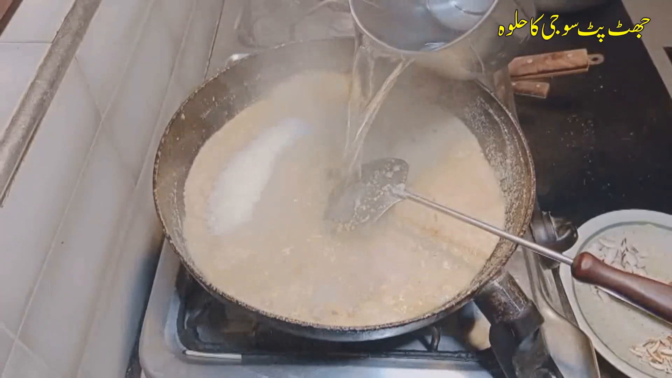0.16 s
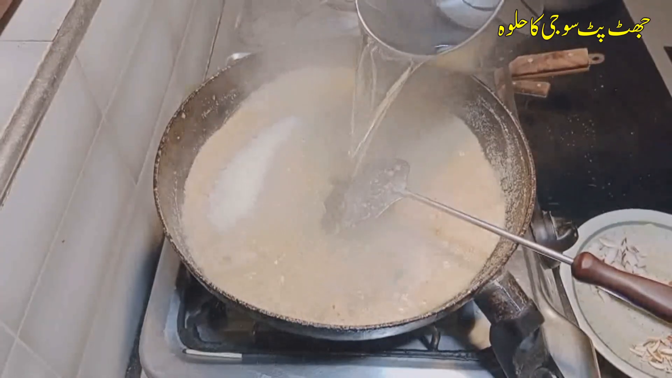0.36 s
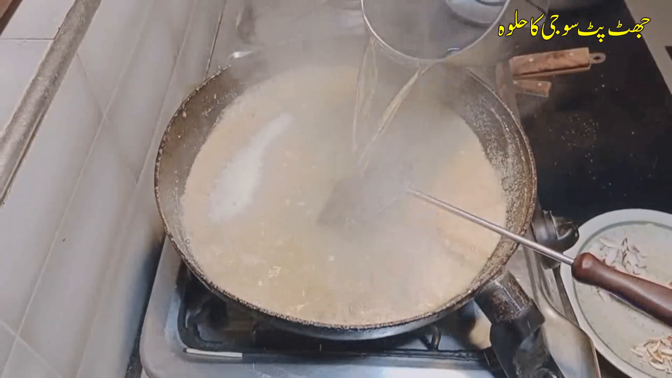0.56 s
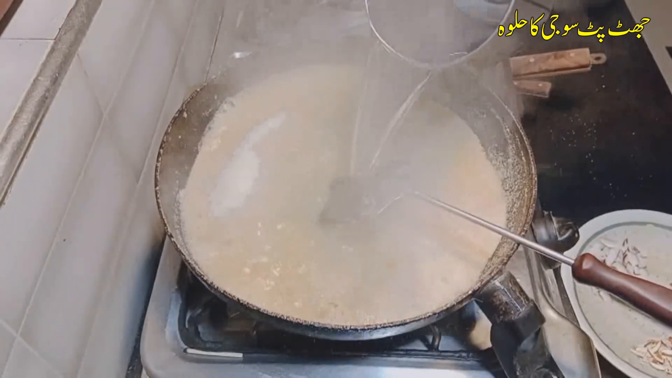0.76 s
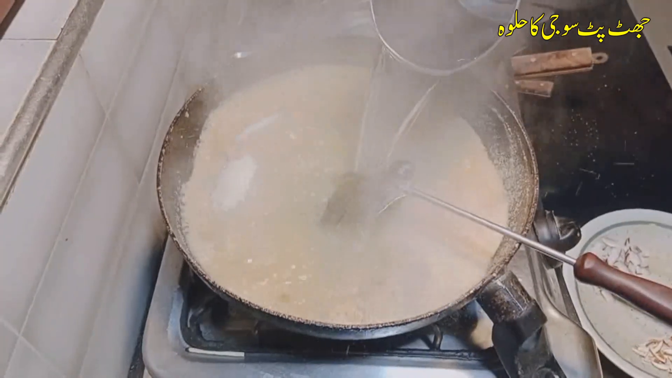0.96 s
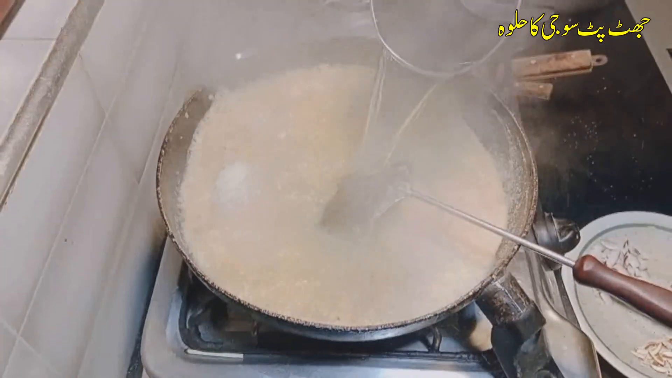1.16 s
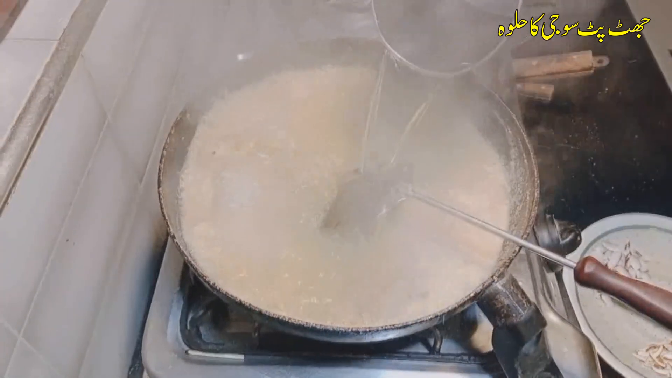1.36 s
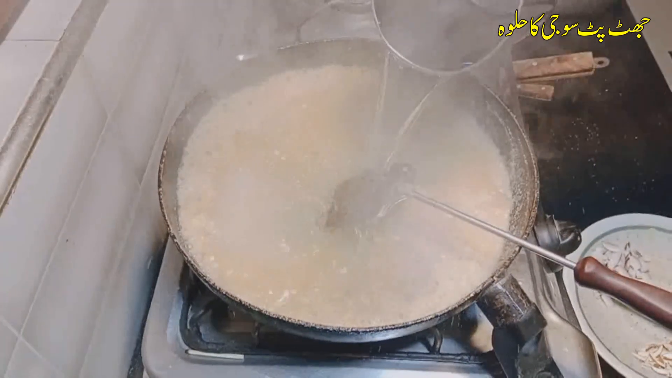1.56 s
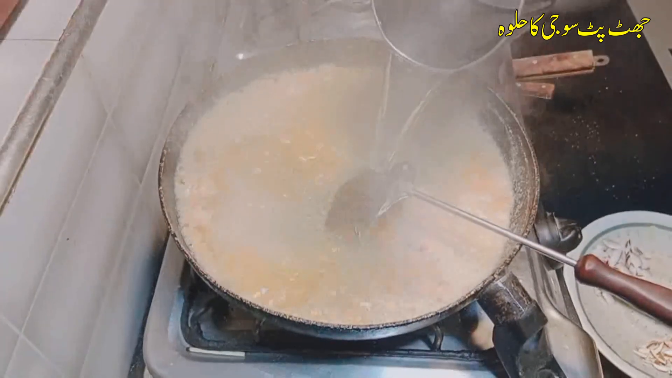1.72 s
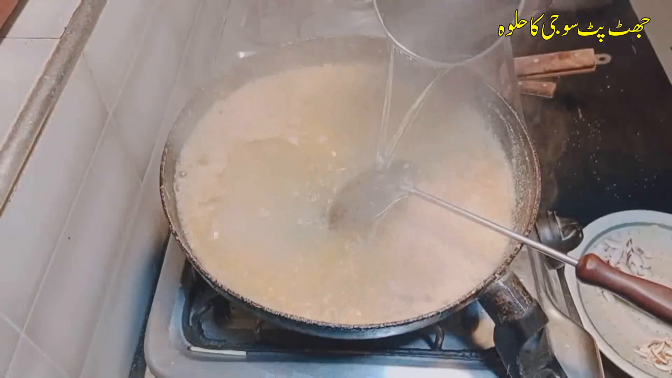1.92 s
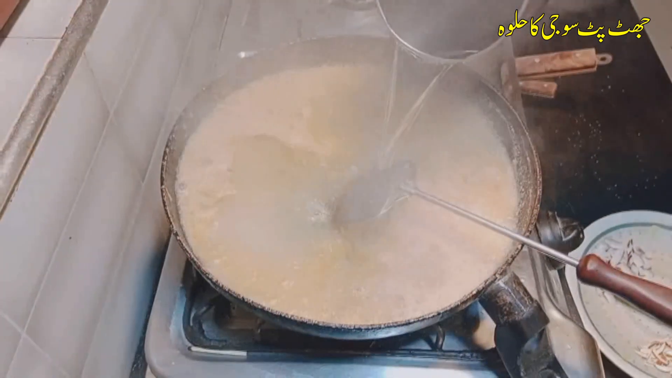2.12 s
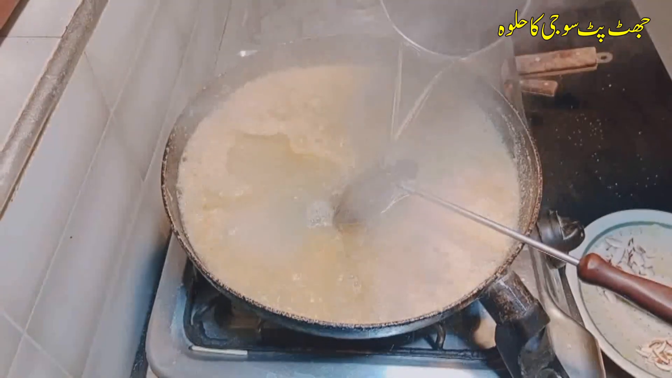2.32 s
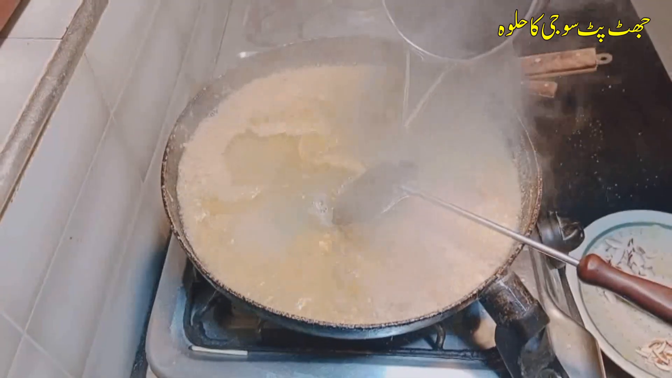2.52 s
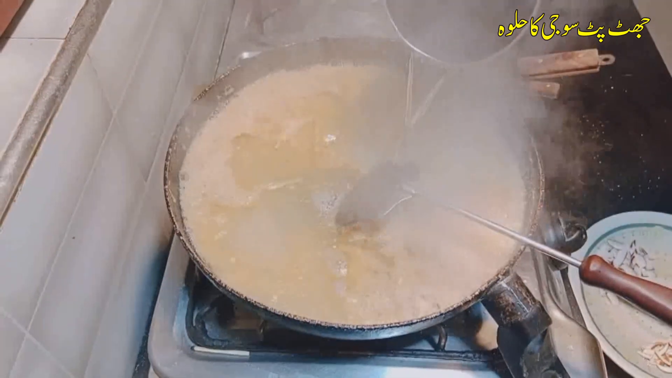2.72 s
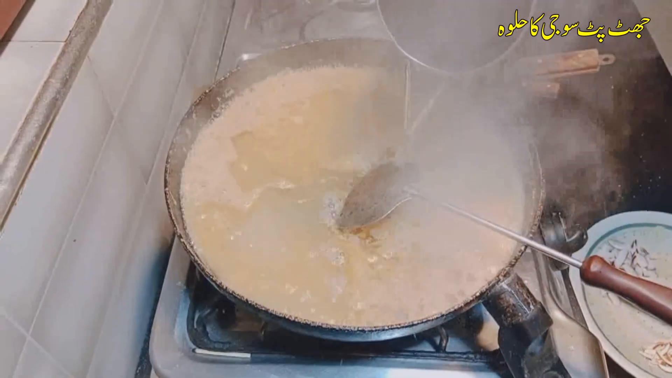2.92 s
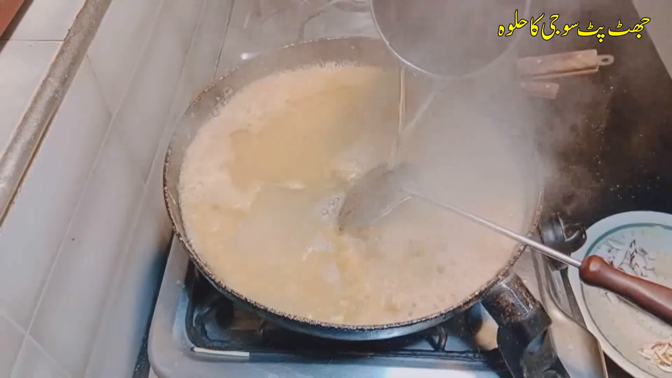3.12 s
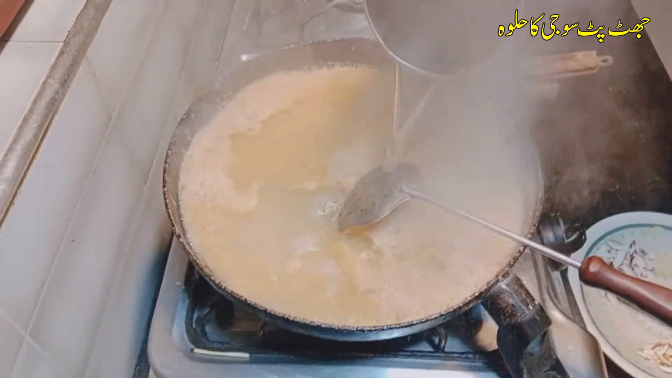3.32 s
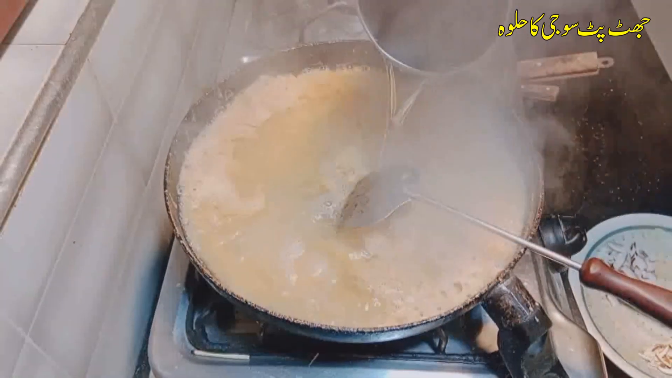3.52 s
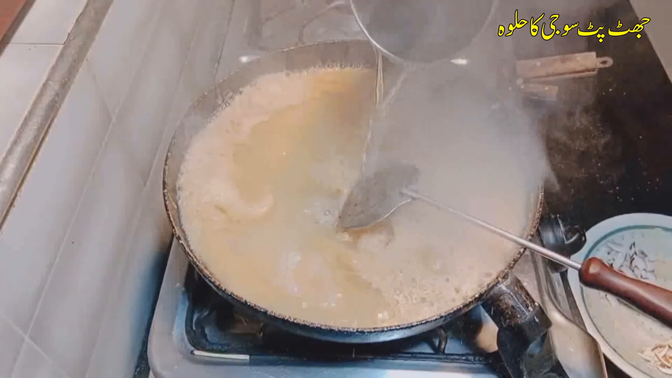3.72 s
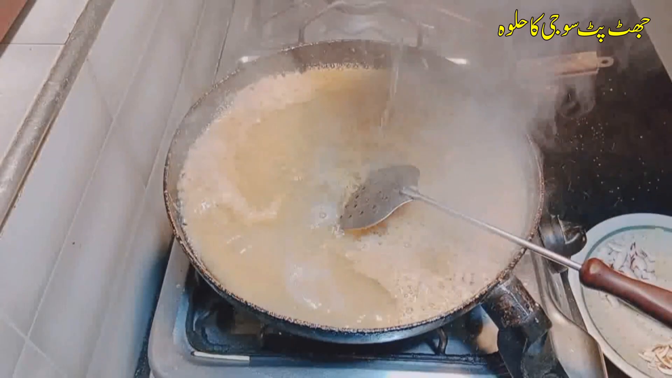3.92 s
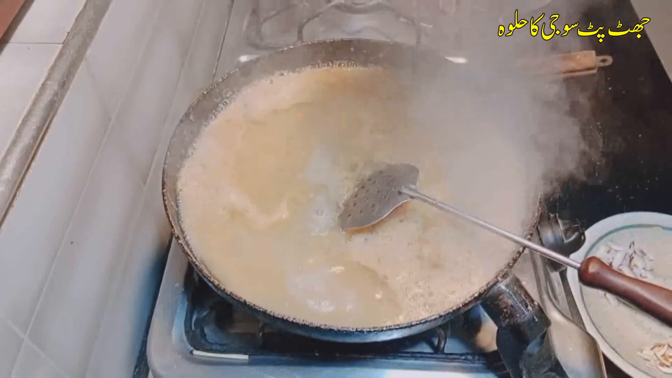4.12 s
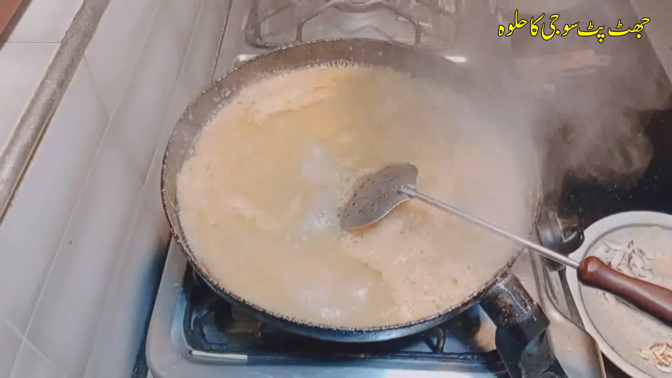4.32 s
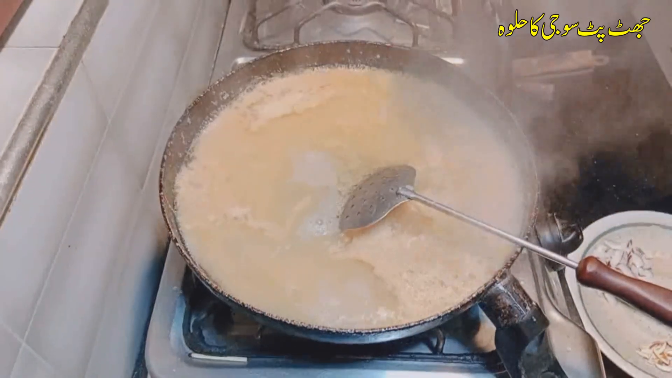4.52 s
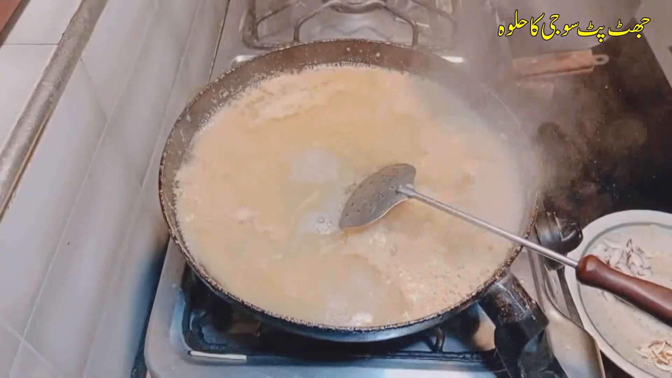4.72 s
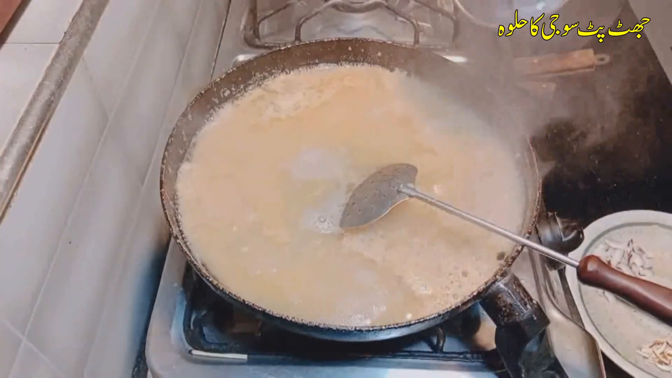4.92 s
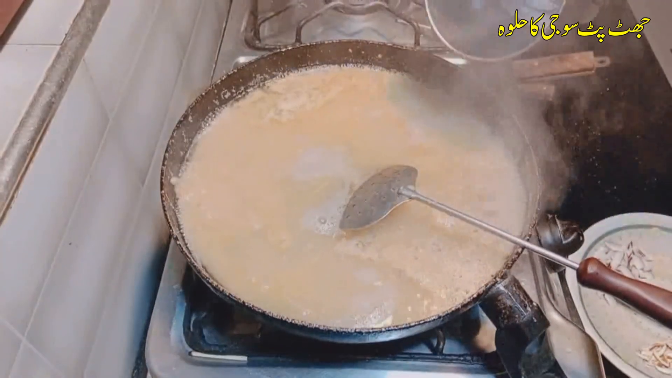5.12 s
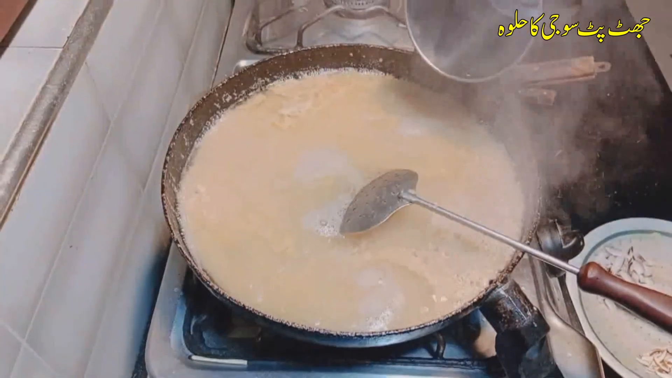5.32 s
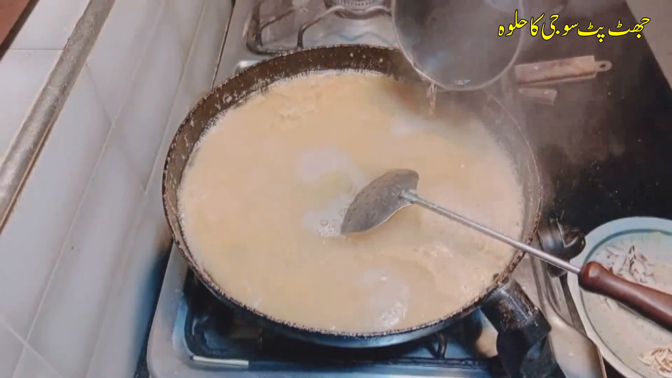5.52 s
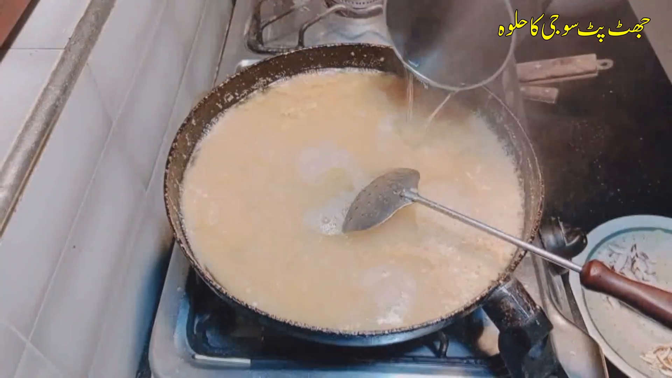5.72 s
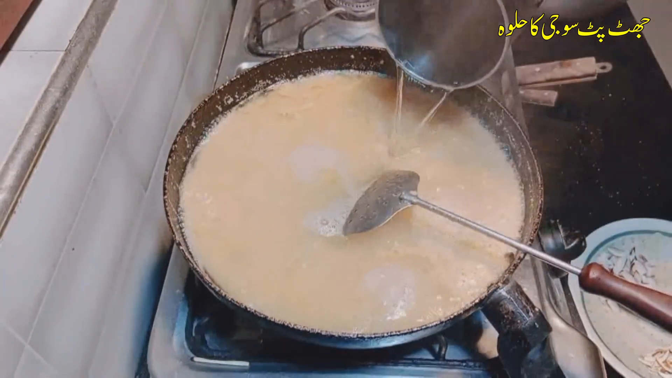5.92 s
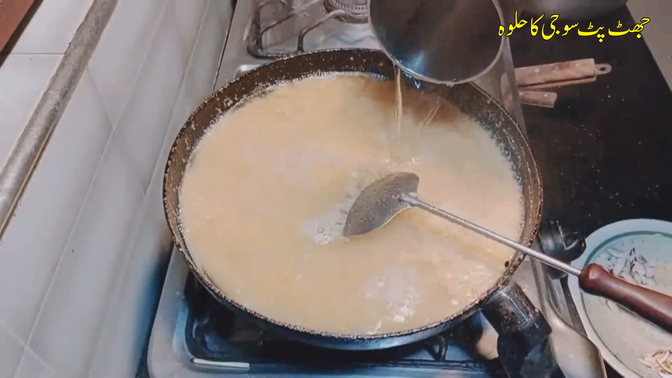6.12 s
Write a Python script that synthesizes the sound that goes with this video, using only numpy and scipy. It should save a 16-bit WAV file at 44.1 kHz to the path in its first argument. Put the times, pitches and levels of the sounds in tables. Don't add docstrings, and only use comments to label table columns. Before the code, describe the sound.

Water streams into a hot pan of thick semolina mix in a small kitchen. A dense, bright sizzle and fizzing steam run steadily, with soft low glugs mostly in the first second and a half. After about four seconds the boil weakens, the pan rings faintly, and a few drops spit near the end. Close phone microphone above the pan, noise-suppressed, louder on the left.

```python
import sys
import numpy as np
from scipy import signal
from scipy.fft import rfft, irfft, next_fast_len
from scipy.io import wavfile
from scipy.ndimage import uniform_filter1d, map_coordinates

SR = 44100
rng = np.random.default_rng(int(sys.argv[2]) if len(sys.argv) > 2 else 0)


def invert_db(x):
    u = np.asarray(x, float) / 20
    return 10 ** u


def to_wav(sig):
    pcm = np.clip(np.atleast_2d(sig), -1, 1) * 32767
    pcm = np.round(pcm).astype(np.int16)
    wavfile.write(sys.argv[1], SR, pcm.T)


N = 271920
KNOT = 64
HZ = np.fft.rfftfreq(next_fast_len(N + 8192), 1 / SR)


def unit(x):
    return x / np.sqrt(np.mean(x ** 2) + 1e-20)


def along(points, hz):
    f, v = np.transpose(points)
    return np.interp(np.log(hz + 1), np.log(f + 1), v)


def curves(rows):
    s, *cols = np.transpose(rows)
    t = np.arange(N) / SR
    return [np.interp(t, s, col, left=col[0]) for col in cols]


def spread(coarse):
    return np.interp(np.arange(N), np.arange(len(coarse)) * KNOT, coarse)


def wobble(rate):
    knots = rng.standard_normal(N // 100)
    position = np.arange(0, N + KNOT, KNOT) * rate / SR
    return spread(map_coordinates(knots, [position]))


def swells(rows, flat):
    s, length = np.array(rows)[:, :2].T[:, :, None]
    t = np.arange(0, N + KNOT, KNOT) / SR
    return np.exp(-np.abs(2 * (t - s) / length) ** (2 * flat) * 2)


def filtered(x, gain):
    size = 2 * (len(HZ) - 1)
    return irfft(rfft(x, size) * gain, size)[:N]


def humps(modes):
    power = sum(invert_db(2 * db) / (1 + (2 * (HZ - hz) / width) ** 2) ** 2 for hz, width, db in modes)
    return np.sqrt(power)


def narrow(modes, steady):
    x = signal.hilbert(filtered(rng.standard_normal(N), humps(modes)))
    return unit(np.real(x / (np.abs(x) + 1e-9) ** np.clip(steady, 0, 1)))


def patchy(depth_db, bins, frames):
    z = signal.stft(rng.standard_normal(N), nperseg=512)[2]
    field = uniform_filter1d(rng.standard_normal(z.shape), bins, 0)
    field = uniform_filter1d(field, frames, 1)
    return unit(signal.istft(z * invert_db(depth_db * unit(field)), nperseg=512)[1][:N])


def bursts(lo_hz, hi_hz, cycles, spread_db, count):
    when, pitch, size = rng.random((count, 3)).T
    hz = (lo_hz * (hi_hz / lo_hz) ** pitch)[:, None]
    t = np.arange(300) / SR
    level = invert_db(spread_db * np.minimum(-np.log(size), 4))[:, None]
    grain = level * np.sin(2 * np.pi * hz * t) * np.exp(-t * hz / cycles)
    at = (when * N).astype(int)[:, None] + np.arange(len(t))
    return unit(np.bincount(at.ravel(), grain.ravel(), N + len(t))[:N])


# frequency in Hz, level in dB per Hz.
KITCHEN_COLOUR = [(15, -49), (25, -17.5), (145, -5), (230, -6.5), (330, -10.5), (500, -11.5), (700, -7),
                  (1200, -25), (2000, -21), (3500, -27), (4800, -21), (8000, -31), (15700, -38)]


def kitchen():
    level_db = -67.5 - 0.32 * curves(GUESS_DRIFT)[0]
    return invert_db(level_db) * unit(filtered(patchy(0.46, 2, 10), invert_db(along(KITCHEN_COLOUR, HZ))))


# centre in seconds, length in seconds,
# low mode in dB, upper mode in dB over the low one, gurgle in dB over the low one.
GLUGS = [(.02, 0.068, -67, -14, -15), (.2, 0.081, -76, 3, -22), (.35, .06, -57, 5, -19),
         (.4, 0.15, -50, -3, -9.5), (.5, .1, -51, -6, -8), (.59, 0.11, -68.5, 15, 11),
         (.75, .1, -79, -15, 21), (.84, 0.11, -62, 12, 8), (.95, .14, -54, 3.5, -3),
         (1.06, 0.14, -57, 2, 0.5), (1.19, 0.13, -55, 2, -18), (1.24, 0.074, -50, -2, -2),
         (1.34, .14, -46.5, -14, -7.5), (1.42, 0.1, -56, 9, -0.5), (1.58, 0.1, -64, -12, 11),
         (1.89, 0.069, -77, 12, 10), (2.09, 0.078, -61.5, 1, -3.5), (2.62, .1, -80, 17, -4),
         (3.63, .1, -75, 18, -13), (5.92, 0.11, -49, -13, -28), (6.05, .16, -57, -20, -30),
         (6.16, 0.091, -49, -12, -35)]
# low mode, upper mode and gurgle, each in dB.
TRICKLE_DB = (-74, -72.5, -75.5)
# frequency in Hz, width in Hz, level in dB.
RUMBLE_MODES = [(111, 17, -1.5), (152.3, 29, 0)]
# frequency in Hz, width in Hz, level in dB.
GURGLE_MODES = [(220, 70, -13.5), (309, 32, -3), (363, 18, 2)]


def pour():
    low_db, upper_db, gurgle_db = np.array(GLUGS)[:, 2:].T
    shape = swells(GLUGS, flat=1.5)
    levels = []
    for over_db, rest_db in zip((0, upper_db, gurgle_db), TRICKLE_DB):
        glugs = spread(invert_db(low_db + over_db) @ shape)
        trickle = invert_db(rest_db + 3 * wobble(9))
        levels.append(glugs + trickle)
    low, upper, gurgle = levels
    thud = low * invert_db(-4.0) * narrow(RUMBLE_MODES[:1], steady=0.19)
    thud = thud + upper * invert_db(-4.5) * narrow(RUMBLE_MODES[1:], steady=0.2)
    return thud + gurgle * invert_db(-5.0) * narrow(GURGLE_MODES, steady=0.45)


# centre in seconds, length in seconds, level in dB.
SINGING = [(3.87, 0.13, -53), (4.02, 0.061, -46), (4.134, 0.084, -50), (4.31, 0.056, -54),
           (4.385, 0.054, -56), (4.48, 0.1, -45.5), (4.65, 0.05, -51.5), (4.73, 0.13, -47.5),
           (4.88, .1, -49.5), (4.97, 0.094, -49), (5.046, 0.066, -44.5), (5.13, 0.064, -45),
           (5.19, 0.063, -46), (5.27, .08, -49), (5.33, 0.063, -56), (5.46, 0.18, -50), (5.54, 0.03, -60),
           (5.735, .15, -49.5), (5.907, 0.089, -61), (6.0, 0.096, -55.5)]
# frequency in Hz, width in Hz, level in dB.
LINGERING_MODES = [(1370, 40, -7), (1510, 110, -5), (2000, 60, 1)]
# centre in seconds, length in seconds, level in dB.
LINGERING = [(4.72, 0.22, -55), (4.95, 0.23, -53.5), (5.15, .15, -52), (5.3, 0.15, -57), (5.63, .1, -64),
             (5.78, 0.067, -66), (6.1, .12, -74)]


def pan_song():
    level, higher = [spread(invert_db(np.array(rows)[:, 2]) @ swells(rows, flat=1.2)) for rows in (SINGING, LINGERING)]
    lowest = level * invert_db(-3.5) * narrow([(802.5, 36, 0)], steady=0.37)
    return lowest + higher * narrow(LINGERING_MODES, steady=0)


# start in seconds, peak in dB, pitch in Hz.
SPITS = [
    (5.4985, -40, 3030),
    (5.8138, -28, 2890),
    (5.847, -32, 3360),
    (5.9066, -30.5, 3100),
    (5.9794, -36, 3260),
    (6.0602, -32, 2840),
    (6.098, -36, 2900),
    (6.1166, -30, 2930),
    (6.1615, -30.5, 2800),
]


def spits():
    out, t = np.zeros(N + 600), np.arange(600) / SR
    rise_s, fall_60db_s = 0.0013, 0.027
    for s, db, hz in SPITS:
        ring = np.sin(2 * np.pi * hz * t) + 0.45 * rng.standard_normal(len(t))
        envelope = invert_db(db - 5.5 - 60 * t / fall_60db_s) * (1 - np.exp(-t / rise_s))
        out[round(s * SR):][:len(t)] += envelope * ring
    return filtered(out[:N], invert_db(along(BUBBLING_COLOUR, HZ)) + invert_db(along(STEAM_COLOUR, HZ)))


# time in seconds, strength in dB,
# steam blown at the microphone in dB, share of big bubbles in dB.
BOIL_COURSE = [(0, -41.5, 1, 4), (.3, -41, 2.5, 4.5), (.55, -39.5, 0.5, 3.5), (.85, -39.5, 1, 6),
               (1.55, -39, .5, 3.5), (1.72, -39, 0, 2), (2.3, -38.5, 0, 3), (2.9, -38, -1.5, 1),
               (3.5, -38, -.5, 1.5), (3.75, -38, 0.5, -1), (4.3, -41, -0.5, 0.5), (4.6, -43, -0.5, 0),
               (5.0, -45, -.5, -2.5), (5.2, -43, -2, 2), (5.5, -48, 1.5, -8.5), (5.8, -49.5, -2, -3),
               (6.02, -55, -0.5, -0.5), (6.17, -53.5, -2.5, -4)]
# centre in seconds, length in seconds, change in dB.
PUFFS = [(.68, 0.11, 0), (1.06, .08, 1.5), (1.42, .1, 0.5), (2.007, 0.11, -0.5), (2.175, 0.053, 1.5),
         (2.647, 0.091, 0.5), (3.05, 0.07, -0.5), (3.197, .1, -0.5), (3.655, .1, 0), (4.35, 0.046, -1),
         (4.824, 0.039, 0), (5.036, 0.026, -5.5), (5.052, .03, 2.5), (5.302, 0.023, 2), (5.614, 0.057, -4),
         (5.652, .03, 1.5), (5.714, .03, -0.5), (5.917, .03, 2.5), (5.953, 0.035, -1), (5.988, 0.021, 1),
         (6.108, 0.11, 2)]
# centre in seconds, length in seconds, big in dB, middling in dB.
BLOOPS = [(1.002, 0.43, -1, -4), (1.75, .15, -3.5, 2.5), (1.88, 0.11, -3, 0.5), (2.083, 0.4, 1.5, 0),
          (2.62, .2, 2, -1.5), (3.056, 0.086, -5.5, -1), (3.505, .2, 0, 0), (3.868, 0.11, 2.5, -3),
          (4.096, 0.11, -2, 0), (4.36, 0.15, 4.5, -2.5), (4.474, 0.17, -8, 4), (4.75, 0.12, 1.5, -4),
          (5.003, 0.44, -5, 4), (5.185, 0.12, 2.5, 1), (5.65, 0.13, 0, 1), (5.797, 0.081, 2.5, -5),
          (5.916, 0.13, -2, -7), (6.05, 0.094, 0, 2)]
# frequency in Hz, level in dB per Hz.
BUBBLING_COLOUR = [(250, -26), (450, -12), (650, -6), (1200, -5), (1800, -4), (2100, 1), (3000, 1.5),
                   (3800, -1.5), (4400, -8), (4800, -23), (5300, -57)]
# frequency in Hz, level in dB per Hz.
STEAM_COLOUR = [(4300, -50), (4800, -28.5), (5400, -12), (6600, -2.5), (7600, 1.5), (8900, -3), (9450, -11),
                (10000, -5.5), (11500, -9), (12900, -5.5), (13900, -11.5), (15300, -5.5), (15700, -10)]
# frequency in Hz, width in Hz, level in dB.
PAN_MODES = [(488.5, 11, 6.5), (690.3, 17.6, 4), (740, 8.8, -21), (979, 13, 5), (1082, 71, 1.5),
             (1356, 76, 4.5), (1558, 260, 1.5), (1990, 350, 1), (2794, 195, -1), (3035, 150, -3),
             (3400, 340, -3), (3990, 270, -6)]


def boil():
    full_db, flicker_per_db = -40.5, 0.0778
    strength_db, plume_db, size_db = curves(BOIL_COURSE)
    big_db, mid_db = [spread(db) for db in np.array(BLOOPS)[:, 2:].T @ swells(BLOOPS, flat=0.67)]
    puff_db = spread(np.array(PUFFS)[:, 2] @ swells(PUFFS, flat=0.38))

    calm_db = np.maximum(full_db - strength_db, 0)
    bubbling_db = strength_db + puff_db + flicker_per_db * calm_db * wobble(30)
    steam_db = plume_db + full_db + 5 + 1.12 * (bubbling_db - full_db) + flicker_per_db * calm_db * wobble(30)
    large_db = size_db + big_db + 1.0 * wobble(5.6)
    middling_db = 3.5 + 0.11 * size_db - 0.9 * np.arange(N) / SR + mid_db + 0.18 * wobble(15)
    surge = 0.5 * wobble(9) + 0.21 * wobble(28) + 0.47 * wobble(70)

    crackle = bursts(727, 4390, cycles=2.73, spread_db=0.95, count=9000)
    froth = patchy(1.24, 3, 5) + (0.32 + 0.04 * calm_db) * crackle
    body = invert_db(along(BUBBLING_COLOUR, HZ)) * np.sqrt(1 + humps(PAN_MODES) ** 2)
    low = 1 / (1 + (HZ / 1750) ** 8)
    lowest = 1 / (1 + (HZ / 1150) ** 8)
    scale = 1 / np.std(filtered(froth, body * (HZ > 1900) * (HZ < 3800)))
    bubbling = filtered(froth, body * (1 - low))
    bubbling = bubbling + invert_db(middling_db) * filtered(froth, body * (low - lowest))
    bubbling = bubbling + invert_db(large_db) * filtered(froth, body * lowest)

    fizz = patchy(0.7, 4, 4) + 0.39 * bursts(4100, 14000, cycles=2.5, spread_db=0.53, count=12000)
    steam = unit(filtered(fizz, invert_db(along(STEAM_COLOUR, HZ))))
    return invert_db(bubbling_db + 0.27 * surge) * scale * bubbling + invert_db(steam_db + surge) * steam


# frequency in Hz, level in dB per Hz.
NOISE_GUESS = [(300, -67), (520, -72.5), (700, -71.5), (900, -78.5), (1050, -79), (1220, -77.5),
               (1450, -86), (1750, -82.5), (2050, -84), (2300, -83), (3000, -93.5), (3750, -87.5),
               (4150, -89.5), (4800, -92.5), (5200, -97), (5450, -99), (5750, -97), (6500, -101),
               (9000, -112)]
# time in seconds, change in dB.
GUESS_DRIFT = [(0, -3.5), (.45, -7.5), (.55, -9), (1.3, -13), (1.6, -16), (1.7, 3.5), (2.2, 3), (4, 2.5),
               (5.3, 8.5), (6.17, 4)]


def suppressed(x, floor_db, sharpness, ragged_db):
    hz, t, z = signal.stft(x, SR, nperseg=1024, noverlap=768)
    density = np.abs(z) ** 2 / (0.75 * SR / 1024)
    density = uniform_filter1d(density, size=2, axis=0)
    density = np.abs(uniform_filter1d(density, size=9, axis=1)) + 1e-20

    drift_share = 1 - 0.13 * (hz[:, None] > 1000)
    drift_db = np.interp(t, *np.transpose(GUESS_DRIFT)) * drift_share
    guess = invert_db(2 * (along(NOISE_GUESS, hz)[:, None] + drift_db))
    fixed_error = rng.standard_normal((len(hz), 1))
    wandering = uniform_filter1d(rng.standard_normal(z.shape), size=60, axis=1) * 6
    guess = guess * invert_db(2 * ragged_db * unit(fixed_error + wandering))

    floor = invert_db(floor_db)
    keep = floor + (1 - floor) / (1 + (guess / density) ** sharpness)
    return signal.istft(z * keep, SR, nperseg=1024, noverlap=768)[1][:N]


def scene():
    sizzle = suppressed(boil() + spits(), floor_db=-15.5, sharpness=4, ragged_db=2.8)
    mono = sizzle + pan_song() + pour() + kitchen()
    return mono * invert_db(np.array([[3.02], [-4.67]]))


# start in seconds, length in seconds, top frequency in Hz.
TREBLE_CUTS = [(4.74, .06, 15300), (4.87, .06, 15300), (5.02, .04, 15200), (5.15, .25, 15300),
               (5.57, .08, 15150), (5.7, .1, 15300), (5.85, .08, 15150), (5.93, .225, 14400)]


def band_limited(x):
    hz, t, z = signal.stft(x, SR, nperseg=1024)
    tops = [np.where((t >= s) & (t < s + length), cut_hz, 15650) for s, length, cut_hz in TREBLE_CUTS]
    top = np.min(tops, axis=0)
    return signal.istft(z * (hz[:, None] < top), SR, nperseg=1024)[1][:N]


def roll_off(x):
    return signal.sosfilt(signal.butter(12, 15700, fs=SR, output="sos"), x)


def record(dry):
    edge = np.clip((15680 - HZ) / 80, 0, 1) ** 2
    limited = np.array([band_limited(filtered(channel, edge)) for channel in dry])
    return roll_off(limited)


dry = scene()
out = record(dry)
to_wav(out)
```